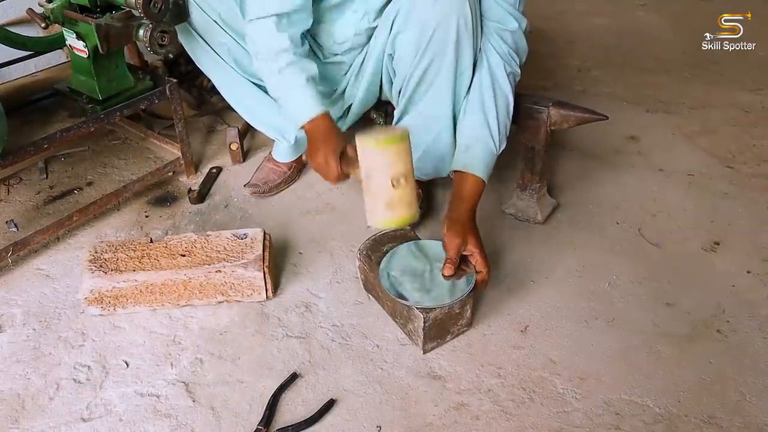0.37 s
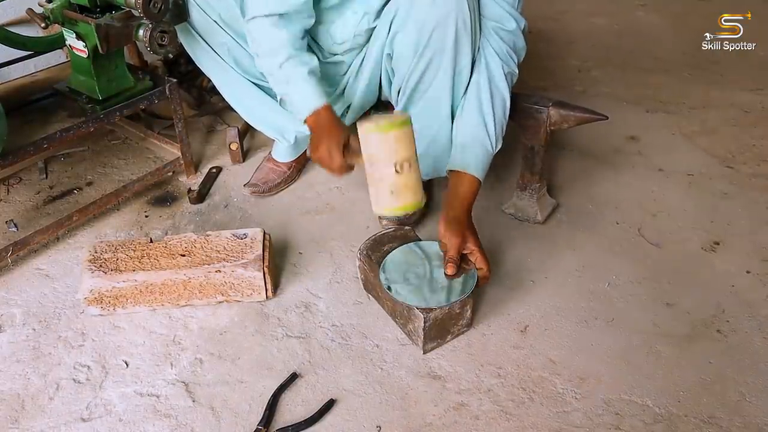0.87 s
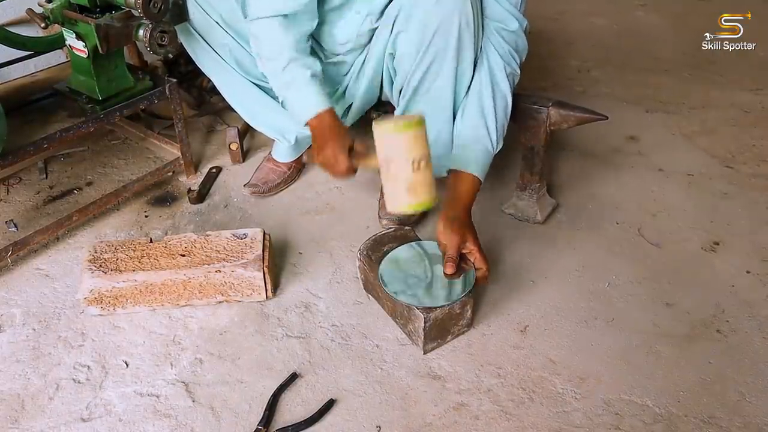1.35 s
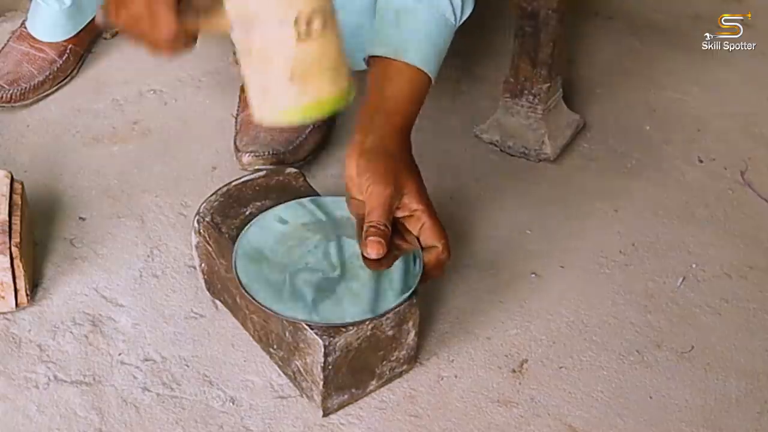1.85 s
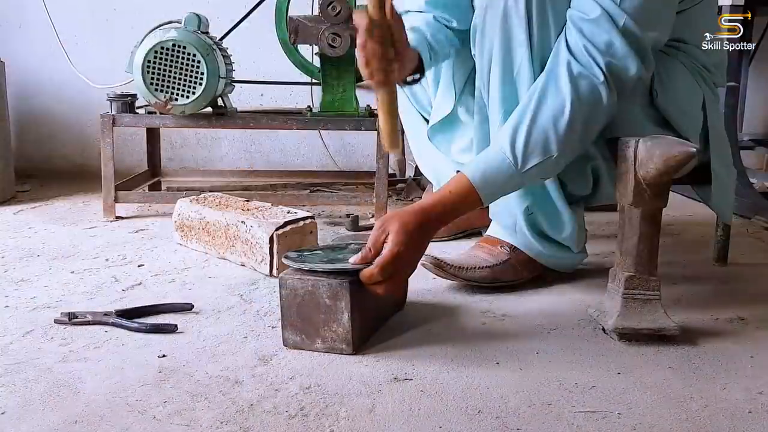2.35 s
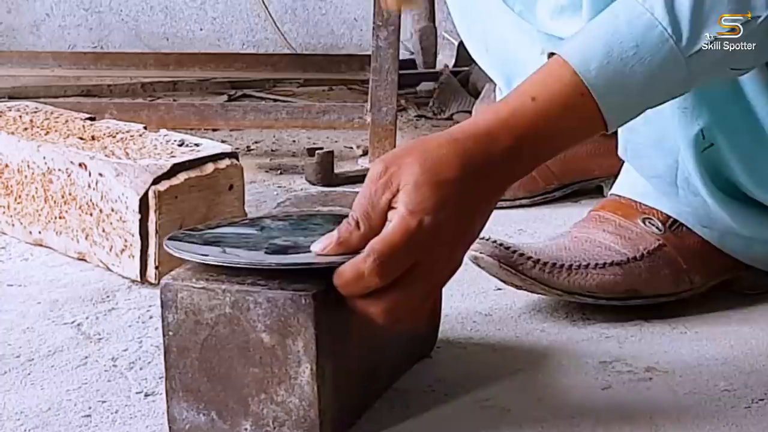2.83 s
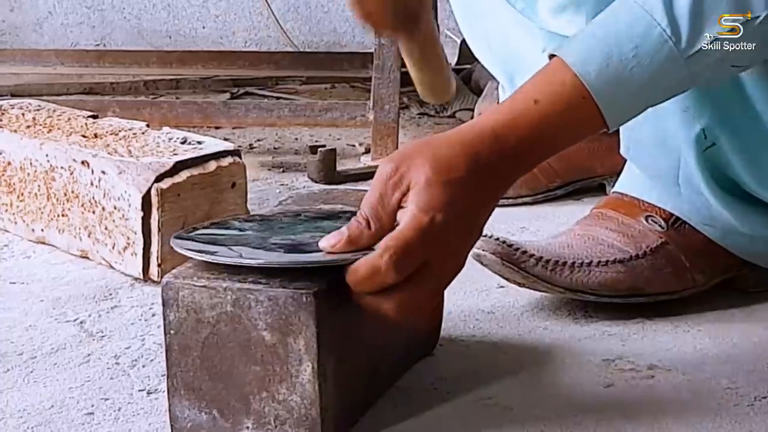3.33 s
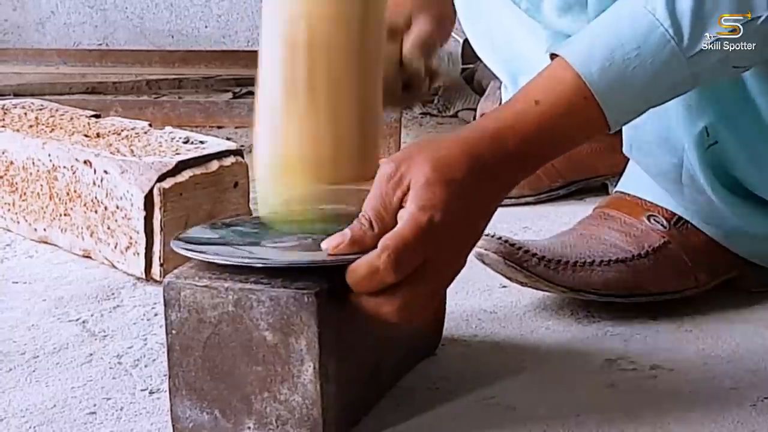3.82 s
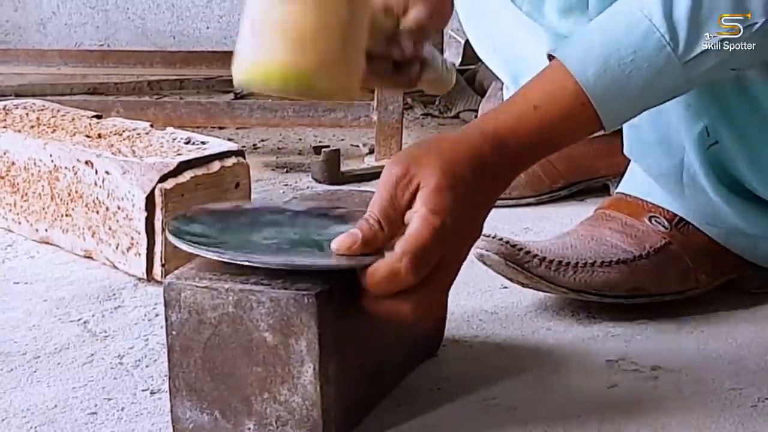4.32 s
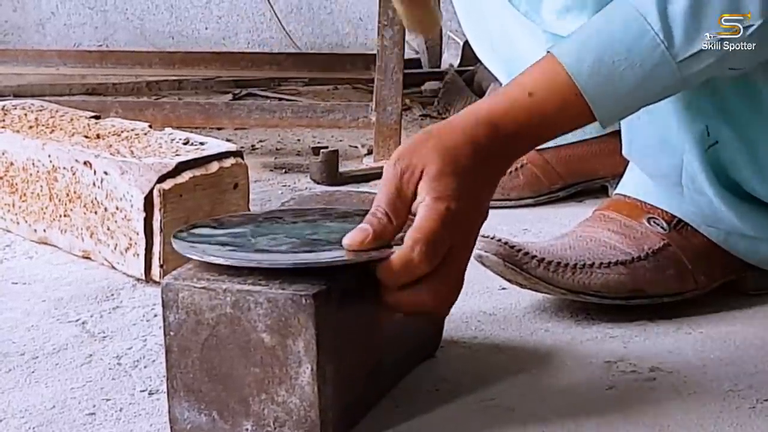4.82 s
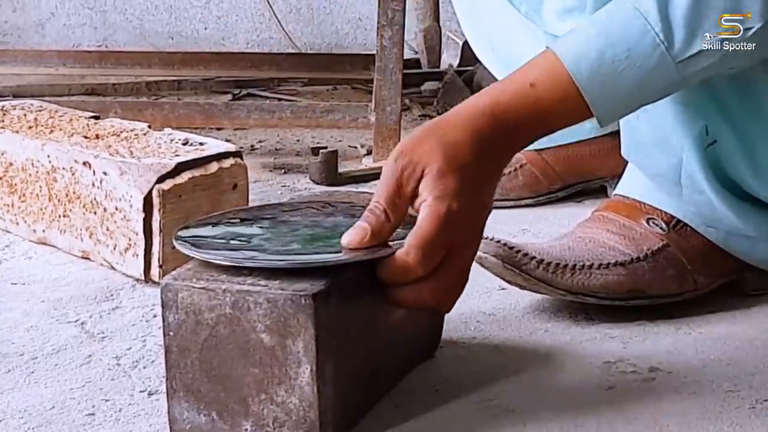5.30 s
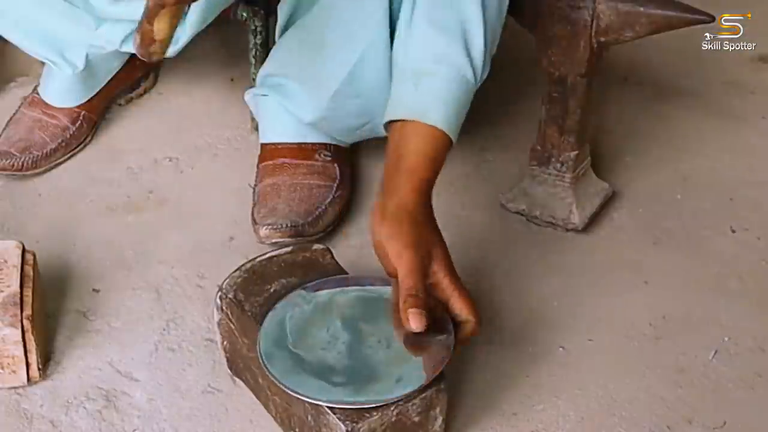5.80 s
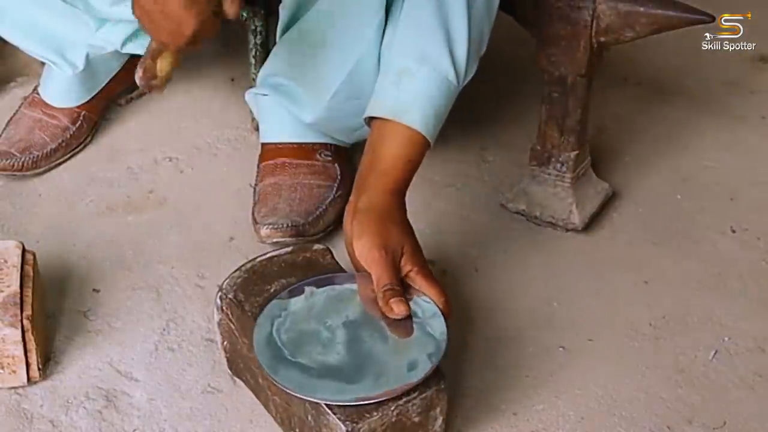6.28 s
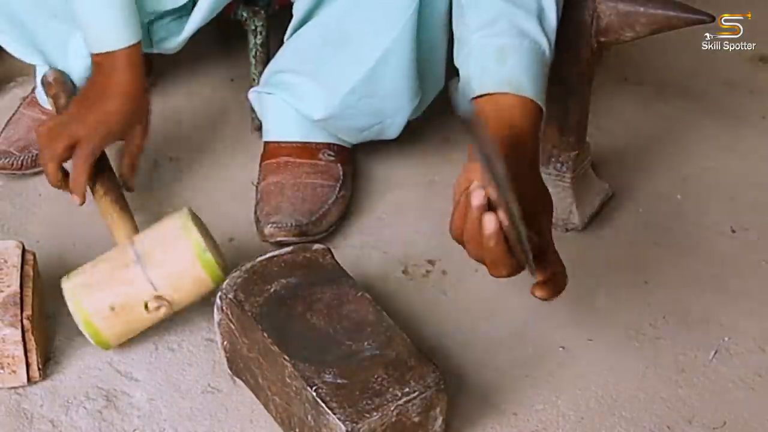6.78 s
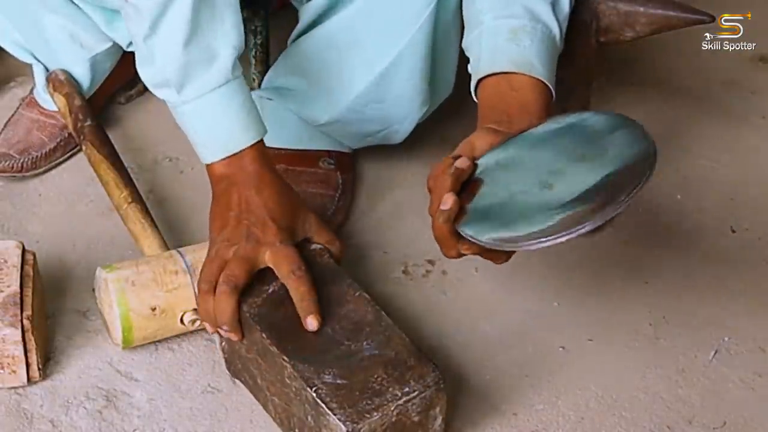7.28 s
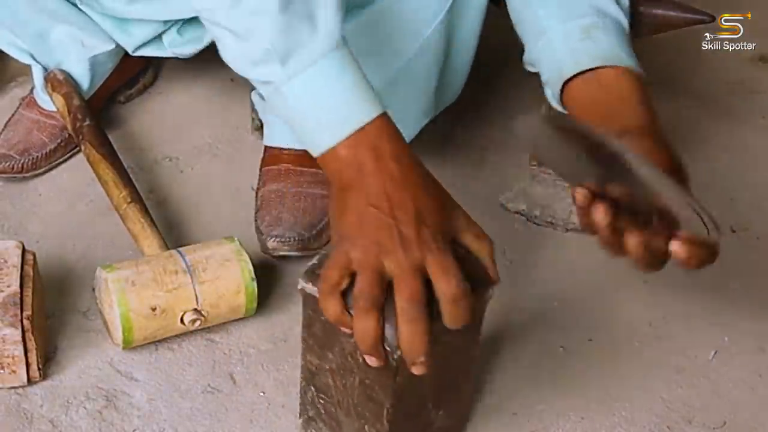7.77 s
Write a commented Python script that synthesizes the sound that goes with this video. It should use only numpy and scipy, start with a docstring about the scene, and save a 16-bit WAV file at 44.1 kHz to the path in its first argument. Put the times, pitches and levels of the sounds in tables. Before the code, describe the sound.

A wooden mallet raps a hand-held steel disc on an iron block about twice a second in a bare echoing workshop, then dull handling knocks.

```python
"""A wooden mallet flattens a hand-held steel disc on an iron block in a bare concrete workshop.
Each blow is a short burst of rattling noise plus fading sine waves for the disc and block, with a
ceiling echo and a reverberant tail. Three shots made with different recorders are cross-faded: the first
and last boxy and strongly ducked, the middle closer and milder. Quiet air and hum lie under them.
At the end the mallet is laid down and the block is turned over, with dull knocks and gritty drags."""
import sys
import numpy as np
from scipy import signal
from scipy.io import wavfile

SR = 44100
rng = np.random.default_rng(int(sys.argv[2]) if len(sys.argv) > 2 else 0)


def volts_from_decibels(level):
    """Turn decibel levels (scalar or array-like) into linear amplitude factors."""
    exponent = np.asarray(level, float) / 20
    return 10 ** exponent


def dump(signal):
    """Clip the signal to [-1, 1] and save it as 16-bit WAV at the path in sys.argv[1]."""
    limited = np.clip(np.atleast_2d(signal).T, -1, 1)
    pcm = np.round(limited * 32767).astype(np.int16)
    wavfile.write(sys.argv[1], SR, pcm)


N = 358974
LEAD = SR // 4  # samples worked out before the start, so that an earlier blow can still ring

# The blows heard in each shot. Each row: start in seconds, strength in dB, level of the lower disc
# modes in dB, best-excited lower disc mode in Hz, level of the upper disc modes in dB.
BLOWS = dict(above=[(-.08, 0, -5.5, 1480, -2), (.4055, 0.5, -7.5, 1440, -0.5),
         (.9055, -0.5, -12.5, 1665, -5), (1.3895, -0.8, -13, 1625, -7), (1.8712, -2.5, -12.5, 1600, -8),
         (2.3585, -6.5, -6.5, 1695, 5)], low=[(1.9995, 4.5, -12, 1580, -26), (2.469, -4, -8.5, 1527, -4.5),
         (2.951, -4, -4, 1697, -8), (3.412, -4, -4.5, 1650, -8), (3.862, -4, -4, 1620, -6.5),
         (4.307, 1.06, -8, 1640, -7), (4.752, 3.2, -7.5, 1663, -7.5), (5.191, 0.5, -15, 1730, -6),
         (5.632, -1.5, -3, 1630, -11)], again=[(5.65, 1.5, -12, 1546, -18.5),
         (6.086, -2.5, -6.5, 1858, -3.5), (6.491, -2.5, -8.5, 2235, -3)])
# The disc, damped by the hand. Each row: pitch in Hz before a small random shift, level in dB,
# time to fade by 60 dB in seconds. The first nine are the lower modes, which follow the place of the blow.
DISC_MODES = [(1390, -19.5, .04), (1480, -4.5, 0.03), (1564, 1.5, .07), (1648, 4.5, 0.03), (1685, 0, .07),
              (1819, 3.5, 0.054), (1837, -0.5, 0.14), (1970, -1.5, 0.06), (2230, -4.5, 0.24),
              (2628, -4.5, 0.038), (3122, -3.5, 0.016), (3637, 4.5, 0.014), (4024, 0.5, 0.017),
              (4700, -7.5, 0.0068), (5520, 1, .015)]
# The iron block. Each row: pitch in Hz, level in dB, time to fade by 60 dB in seconds.
IRON_MODES = [(13160, -36, 0.95), (14710, -41, .8), (15010, -38.5, .9)]
# Best-excited upper disc mode as the disc is turned under the mallet. Each row: time in seconds, pitch in Hz.
UPPER_BEST = [(0, 3600), (3, 3800), (3.4, 2550), (5.3, 2600), (6, 3400)]
# Colour of the direct crack in each shot. Each row: frequency in Hz, level in dB.
CRACK_COLOUR = dict(above=[(76, -20.5), (130, -2.5), (1970, -9), (2510, -10), (5290, -10), (10300, -16.5),
                (14200, -16), (16000, -23)], low=[(120, -30.5), (200, 0), (1100, -6.5), (1650, -4),
                (2210, -6), (5840, -3.5), (8580, -8), (16000, -6)], again=[(76, -22), (130, -4.5),
                (1640, -8.5), (2140, -9), (3910, -10), (6210, -19), (13600, -26.5), (16000, -36)])
# Colour of the sound that fills the room in each shot. Each row: frequency in Hz, level in dB.
FILL_COLOUR = dict(above=[(30, -28), (90, -22.5), (200, -15.5), (400, -17.5), (650, -14.5), (1200, -11.5),
               (2200, -10), (4000, -10.5), (7000, -14.5), (13000, -18.5), (16000, -23)], low=[(30, -19),
               (85, -9.5), (170, -8.5), (300, -16), (570, -8.5), (1200, -10), (2300, -8.5), (6000, -9.5),
               (9500, -21), (14500, -12), (16000, -15.5)], again=[(30, -21.5), (90, -33), (210, -17),
               (600, -17.5), (1170, -21), (1600, -11.5), (3800, -14.5), (7000, -22.5), (13600, -26.5),
               (16000, -20)])
# Reverberation in each shot. Each row: frequency in Hz, time to fade by 60 dB in seconds.
REVERB_T60 = dict(above=[(100, 1.15), (700, 1.04), (1800, 1.007), (5000, 0.9), (13000, 0.51)],
              low=[(100, 1.13), (700, 0.89), (1800, 0.87), (5000, 0.78), (13000, 0.43)], again=[(100, 0.61),
              (700, 1.02), (1800, 0.92), (5000, 0.94), (13000, 0.47)])
# Left-right likeness of the diffuse sound in each shot. Each row: frequency in Hz, correlation (-1 to 1).
LIKENESS = dict(above=[(60, 1), (180, 1), (550, 0.92), (1650, 0.22), (4970, -0.63), (15000, -0.66)],
            low=[(60, 1), (180, 0.96), (550, 0.82), (1650, -0.0), (4970, 0), (15000, 0.19)], again=[(60, 1),
            (180, 1), (550, 0.83), (1650, 0.031), (4970, -0.65), (15000, -0.53)])
# Colour of the quiet shop air. Each row: frequency in Hz, relative level in dB per Hz.
AIR_COLOUR = [(18, -60), (30, -30), (81, -20), (141, -1), (184, -16.5), (889, -18), (1040, -22.5),
              (2230, -19), (2410, -19), (16000, -48)]
# Mains hum. Each row: frequency in Hz, level in dB rms before the bass is cut.
HUM = [(124, -76), (250, -79)]
# The balance of each shot. The entries: direct level in dB, room level in dB, ceiling echo delay in seconds,
# echo level in dB, left minus right in dB, left lead in samples (rounded when used),
# air level in dB, low rumble level in dB.
BALANCE = dict(above=(5, -1.5, .022, -12, -1, 1.5, -57.5, -58),
           low=(-8, -7, .0165, -10, 3.5, 2.5, -60, -59), again=(-9, -15, .02, -18.5, -2, -0.5, -65.5, -87))
# Gain control in each shot. The entries: overload level (full scale is 1), threshold in dB, share of the
# excess removed, attack in seconds, recovery of the excess in dB per second.
DUCKING = dict(above=(.4, -16.5, .86, .002, 155), low=(1.2, -12, .4, .003, 200),
           again=(.33, -20, .4, .008, 140))
# Air pushed out from under the disc, hitting the left port. Each row: start in seconds, level in dB,
# pitch in Hz, length in seconds.
PUFFS = [(2.4703, -4, 66.5, .028), (4.311, -8, 105, 0.013), (4.753, -32, 80, .02),
         (5.2, -23.5, 79.1, 0.016)]
# The disc ticks against the block as it is turned. Each row: start in seconds, level in dB.
TICKS = [(3.7763, -56), (4.19, -58), (4.6494, -44), (5.7184, -20), (5.7553, -27)]
# Knocks of handling. Each row: start in seconds, level in dB, body pitch in Hz, time for the body pitch to
# fade by 60 dB in seconds, click level in dB relative to the knock.
KNOCKS = [(6.81, -45.5, 500, 0.023, -34), (6.9236, -30.5, 1324, 0.012, -31), (7.827, -20, 343, 0.02, -18.5),
          (7.947, -30, 233, 0.038, -42), (8.012, -42.5, 320, .04, -39.5), (8.071, -40, 256, 0.071, -38.5),
          (8.122, -38, 1940, 0.04, 8)]
# Modes shared by the knocks. Each row: ratio to the body pitch, level in dB relative to the knock.
KNOCK_BODY = [(.3, -16), (.45, -10), (.6, -4.5), (.8, -5), (1, 0), (1.25, -2.5), (1.6, -1), (2.5, -3)]
# The block dragged on concrete. Each row: start in seconds, length in seconds, level in dB before it fades,
# lowest frequency in Hz, highest frequency in Hz.
SCRAPES = [(7.427, 0.1, -62.5, 2010, 11000), (7.519, 0.23, -62.5, 250, 890),
           (7.563, 0.11, -69.5, 2000, 9400)]
# Cross-fades from one shot to the next. Each row: start in seconds, end in seconds.
CROSS_FADES = [(1.899, 2.72), (5.548, 6.06)]

# How far from the best-excited mode others still ring, in octaves
LOWER_REACH, UPPER_REACH, IRON_REACH = 0.078, 0.35, 0.1
# The best-excited iron mode climbs as the work moves over the block
IRON_FROM_S, IRON_FROM_HZ, IRON_CLIMB_HZ_PER_S = 3.75, 13160, 1100
CONTACT_S = dict(above=0.002, low=0.0021, again=0.0025)  # decay of the rattling contact
OWN_RATTLE = 0.8  # amount of extra rattle that reaches only one of the two ports
PUSH = 0.3  # one-sided shove of the mallet head beside the rattle: the low body of each blow
RATTLE_LOW_HZ = 500  # the rattle is thinned out below this, leaving mostly the shove
LIFTED_S, LIFTED_HZ, LIFTED_DB, LIFTED_T60_S = 6.495, 2245, -45, 1.37
KNOCK_RISE_S, KNOCK_ROOM_DB, KNOCK_ROOM_FADE_S = 0.0012, -1, 0.51
SCRAPE_RISE_S, SCRAPE_FADE_DB, GRAINS_PER_S, GRAIN_SPREAD_DB = 0.029, -15.5, 3100, 2.5
EDGE_HZ = 15800  # top of the final band limit


def read(points, hz):
    """Reads a table between its rows, on a log-frequency axis."""
    f, value = np.transpose(points)
    return np.interp(np.log(hz + 1), np.log(f + 1), value)


def unit(x):
    """Scales a sound to energy one."""
    return x / np.sqrt(np.sum(x ** 2) + 1e-20)


def add(mix, s, sound):
    """Mixes a sound in at a time in seconds."""
    part = mix[..., round(s * SR) + LEAD:][..., :sound.shape[-1]]
    part += sound[..., :part.shape[-1]]


def band_filter(x, hz, kind):
    """Gentle filter: keeps what is above a frequency ("high") or between two ("band")."""
    return signal.sosfilt(signal.butter(2, hz, kind, fs=SR, output="sos"), x)


def colour(points):
    """Short impulse with the given spectrum, its energy as early as possible (minimum phase)."""
    level_db = read(points, abs(np.fft.fftfreq(8192, 1 / SR)))
    log_size = np.log(volts_from_decibels(np.maximum(level_db, -80)))
    phase = -signal.hilbert(log_size).imag
    impulse = np.fft.ifft(np.exp(log_size + 1j * phase)).real
    return unit(impulse[:3000])


def ring(hz, db, t60):
    """One vibration mode: a sine wave that dies away, one second long."""
    t = np.arange(SR) / SR
    return volts_from_decibels(db - 60 * t / t60) * np.sin(2 * np.pi * hz * t)


def diffuse(length, same, level_db):
    """Stereo noise from random short-time spectra; level_db maps (Hz, seconds) to dB."""
    hz = np.fft.rfftfreq(512, 1 / SR)[:, None]
    t = np.arange(length // 128 + 5) * 128 / SR
    a, b, c, d = rng.standard_normal((len(t), 257, 4)).T
    like = np.clip(read(same, hz), -1, 1)
    left = a + 1j * b
    right = like * left + np.sqrt(1 - like ** 2) * (c + 1j * d)
    spectra = np.array([left, right]) * volts_from_decibels(level_db(hz, t))
    return signal.istft(spectra, nperseg=512, noverlap=384)[1][:, :length]


def workshop(name):
    """Reverberant tail, energy one a channel; drawn afresh at every use so that no two tails are identical."""
    room = diffuse(SR, LIKENESS[name], lambda hz, t: -60 * t / read(REVERB_T60[name], hz))
    build_up = np.clip((np.arange(SR) / SR - 0.002) / 0.0032, 0, 1)
    return unit(room * build_up) * np.sqrt(2)


def rattle(decay):
    """Hard surfaces chattering together: noise with a sudden start and a fast decay (seconds)."""
    t = np.arange(SR) / SR
    return unit(rng.standard_normal(SR) * np.exp(-t / decay) * np.minimum(t / 0.0001, 1))


def cracks(name):
    """Direct contact noise at the two ports: a shared rattle and shove, plus a rattle of each port's own."""
    t = np.arange(SR) / SR

    def clatter():
        return band_filter(rattle(CONTACT_S[name]), RATTLE_LOW_HZ, "high")

    common = clatter() + PUSH * unit(np.exp(-t / CONTACT_S[name]))
    ports = [unit(common + OWN_RATTLE * clatter()) for _ in range(2)]
    return [signal.oaconvolve(port, colour(CRACK_COLOUR[name]))[:SR] for port in ports]


def nearness_db(hz, best_hz, reach, most):
    """A mode rings less the further its pitch lies from the best-excited one, down to a floor."""
    return -6 * min((np.log2(hz / best_hz) / reach) ** 2, most)


def disc_ring(s, ring_db, best_hz, upper_db):
    """The disc's modes, weighted by where it is struck and shifted slightly at random."""
    lower, upper = np.zeros(SR), np.zeros(SR)
    for hz, db, t60 in DISC_MODES[:9]:
        level_db = db + nearness_db(hz, best_hz, LOWER_REACH, 3.03)
        lower += ring(hz * rng.uniform(0.98, 1.004), level_db, t60)
    upper_best_hz = np.interp(s, *np.transpose(UPPER_BEST))
    for k, (hz, db, t60) in enumerate(DISC_MODES[9:]):
        level_db = db + nearness_db(hz, upper_best_hz, UPPER_REACH, 1.3)
        upper += (-1) ** k * ring(hz * rng.uniform(0.94, 1.02), level_db, t60)
    soft_start = np.minimum(np.arange(SR) / SR / 0.0012, 1)
    return (volts_from_decibels(ring_db) * lower + volts_from_decibels(upper_db) * upper) * soft_start


def iron_ring(s):
    """The block's high modes; the best-excited pitch climbs as the work moves over the block."""
    best_hz = IRON_FROM_HZ + IRON_CLIMB_HZ_PER_S * max(s - IRON_FROM_S, 0)
    return sum(ring(hz, db + nearness_db(hz, best_hz, IRON_REACH, 8), t60) for hz, db, t60 in IRON_MODES)


def blow(name, s, strength_db, ring_db, best_hz, upper_db):
    """A few milliseconds of contact and the modes it leaves: direct, off the ceiling, and reverberated."""
    direct_db, room_db, echo_s, echo_db, _, lead = BALANCE[name][:6]
    modes = disc_ring(s, ring_db, best_hz, upper_db)
    if name == "low":
        modes += iron_ring(s)
    fill = 10 * np.pad(colour(FILL_COLOUR[name]), (0, SR))[:SR]
    reverberated = sum(signal.fftconvolve(part[None], workshop(name), axes=1) for part in (fill, modes))
    out = volts_from_decibels(room_db) * reverberated
    left, right = (10 * crack * volts_from_decibels(direct_db) + modes * volts_from_decibels(room_db - 7.5) for crack in cracks(name))
    out[0, :SR] += left
    out[1, round(lead):][:SR] += right
    for side in out:  # the ceiling echo is scattered by beams
        scattered = signal.oaconvolve(rattle(0.0046), fill)[:SR]
        side[round(echo_s * SR):][:SR] += volts_from_decibels(echo_db) * (scattered + modes)
    return volts_from_decibels(strength_db) * out


def shop_air(name):
    """Quiet shop air as coloured noise, with a low band of it added as the rumble of far machinery."""
    air_db, rumble_db = BALANCE[name][6:]
    air = diffuse(N + LEAD, LIKENESS[name], lambda hz, t: read(AIR_COLOUR, hz))
    rumble = band_filter(air, [72, 100], "band")
    return (volts_from_decibels(air_db) * unit(air) + volts_from_decibels(rumble_db) * unit(rumble)) * np.sqrt(air.size)


def mains_hum():
    """Steady sine waves from the mains."""
    t = np.arange(N + LEAD) / SR
    return sum(volts_from_decibels(db) * np.sqrt(2) * np.sin(2 * np.pi * hz * t) for hz, db in HUM)


def puff(db, hz, length):
    """Air pushed against a port: a short swing of slow pressure."""
    t = np.arange(SR // 10) / SR
    return volts_from_decibels(db) * np.cos(2 * np.pi * hz * t + 0.37) * np.exp(-(t / length) ** 2)


def tick(db):
    """A thin steel click with a short spray of reflections, both made of high noise."""
    t = np.arange(2000) / SR
    fade = np.exp(-t / 0.00058) + 0.11 * np.exp(-t / 0.012)
    return volts_from_decibels(db) * band_filter(rng.standard_normal((2, 2000)) * fade, 9000, "high")


def lifted_disc():
    """Lifted off the block after the last blow, the disc sings on in one mode, alike on both sides."""
    return ring(LIFTED_HZ, LIFTED_DB, LIFTED_T60_S) * np.ones((2, 1))


def knock(db, hz, t60, click_db):
    """A dull knock of wood or iron on concrete: body modes with a soft start, and a noisy click."""
    body = np.zeros(SR)
    for i, (ratio, mode_db) in enumerate(KNOCK_BODY):
        body += (-1) ** i * ring(hz * ratio, db + mode_db, t60 / ratio)
    t = np.arange(SR) / SR
    click = rng.standard_normal(SR) * np.exp(-t / 0.002)
    return body * np.minimum(t / KNOCK_RISE_S, 1) + volts_from_decibels(db + click_db) * click


def scrape(length, db, low_hz, high_hz):
    """Grit crushed under sliding iron: random grains in a band, setting in quickly, then fading."""
    t = np.arange(0, length, 1 / SR)
    size = volts_from_decibels(GRAIN_SPREAD_DB * rng.exponential(1, len(t)))
    crushed = rng.random(len(t)) < GRAINS_PER_S / SR
    grains = size * crushed * rng.standard_normal(len(t))
    rub = unit(band_filter(grains, [low_hz, high_hz], "band")) * np.sqrt(len(t))
    return rub * np.minimum(t / SCRAPE_RISE_S, 1) * volts_from_decibels(db + SCRAPE_FADE_DB * (t / length) ** 2)


def handling():
    """The knocks and gritty drags, in a room whose tail dies faster."""
    out = np.zeros(N + LEAD)
    for s, *shape in KNOCKS:
        add(out, s, knock(*shape))
    for s, *shape in SCRAPES:
        add(out, s, scrape(*shape))
    # floor-level sounds stir mostly the near walls
    nearby = workshop("again") * np.exp(-np.arange(SR) / SR / KNOCK_ROOM_FADE_S)
    return out + volts_from_decibels(KNOCK_ROOM_DB) * signal.fftconvolve(out[None], nearby, axes=1)[:, :N + LEAD]


def duck(x, clip, threshold_db, share, attack, recover_db):
    """A gain that drops within milliseconds and climbs back steadily, then a soft overload."""
    power = signal.lfilter([0.02], [1, -0.98], (x ** 2).mean(0))
    power_db = 10 * np.log10(power + 1e-12)
    # the excess holds its latest peak, which sinks at a fixed rate
    climb = np.arange(x.shape[1]) * recover_db / SR
    over_db = np.maximum(np.maximum.accumulate(power_db - threshold_db + climb) - climb, 0)
    r = np.exp(-1 / (attack * SR))
    smooth_db = signal.lfilter([1 - r], [1, -r], over_db)
    return clip * np.tanh(x / volts_from_decibels(share * smooth_db) / clip)


def shot(name):
    """All that is heard in one shot, with its own blows and gain control."""
    heard = shop_air(name) + mains_hum()
    for s, *controls in BLOWS[name]:
        add(heard, s, blow(name, s, *controls))
    if name == "again":
        heard += handling()
        add(heard, LIFTED_S, lifted_disc())
    heard = band_filter(heard, 45, "high")  # small capsules lose the bass
    pan_db = BALANCE[name][4]
    out = duck(heard * volts_from_decibels([[pan_db / 2], [-pan_db / 2]]), *DUCKING[name])
    if name == "low":  # puffs and ticks are not ducked
        for s, *shape in PUFFS:
            add(out[0], s, puff(*shape))
        for s, db in TICKS:
            add(out, s, tick(db))
    return out[:, LEAD:]


def scene():
    """The three shots, cross-faded."""
    t = np.arange(N) / SR
    to_second, to_third = (np.clip((t - start) / (end - start), 0, 1) for start, end in CROSS_FADES)
    first = shot("above") * (1 - to_second)
    second = shot("low") * to_second * (1 - to_third)
    return first + second + shot("again") * to_third


def band_limit(x):
    """A steep low-pass at the top of the band."""
    return signal.sosfilt(signal.butter(12, 17040, fs=SR, output="sos"), x)


def record(dry):
    """Cuts the highest treble and clips at full scale to finish the mix."""
    edge = signal.firwin(511, EDGE_HZ, window=("kaiser", 8), fs=SR)[None]
    mix = np.clip(signal.oaconvolve(dry, edge, "same"), -1, 1)
    return band_limit(mix)


dry = scene()
out = record(dry)
dump(out)
```